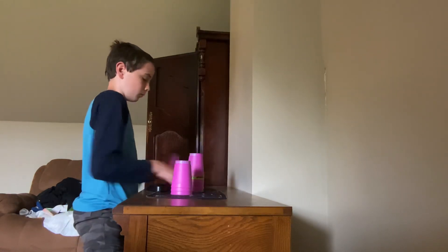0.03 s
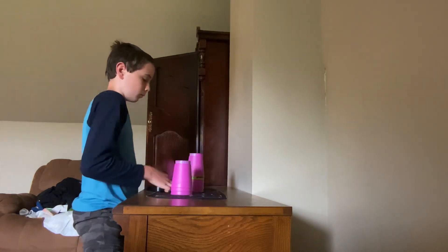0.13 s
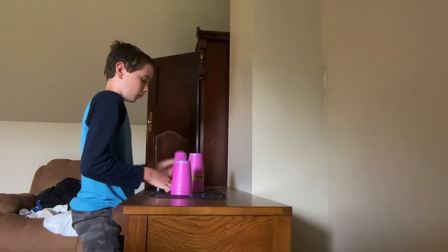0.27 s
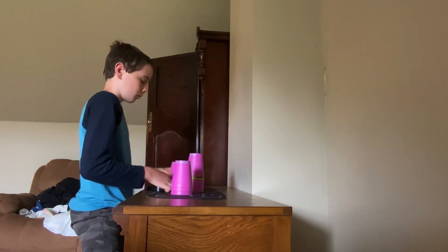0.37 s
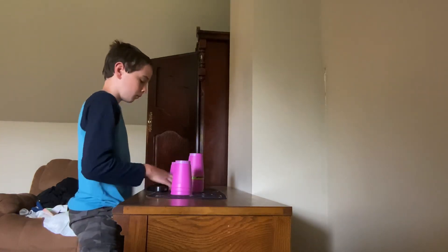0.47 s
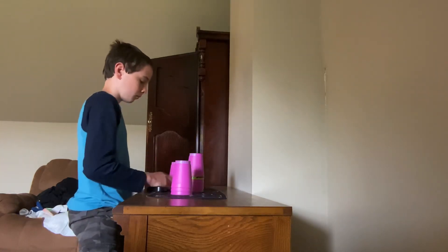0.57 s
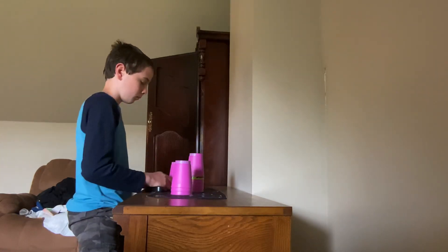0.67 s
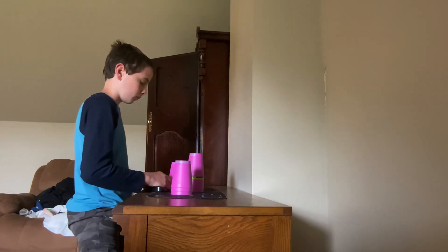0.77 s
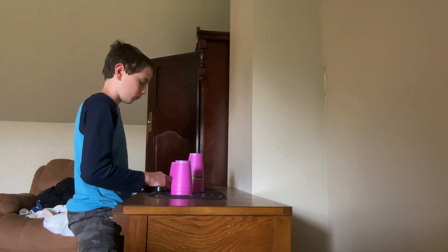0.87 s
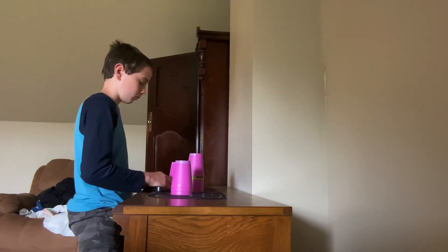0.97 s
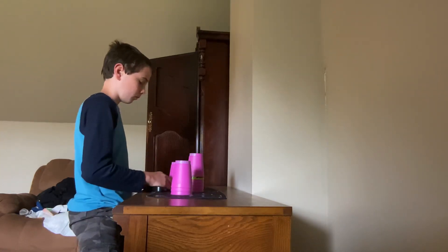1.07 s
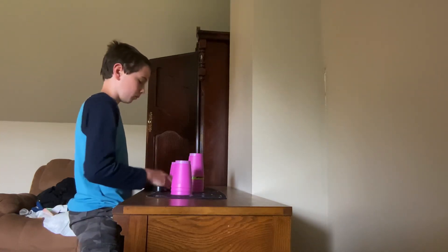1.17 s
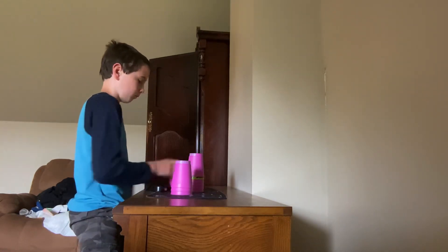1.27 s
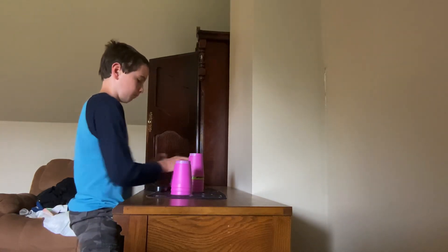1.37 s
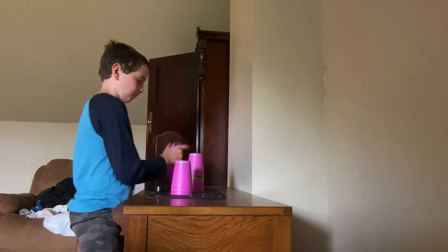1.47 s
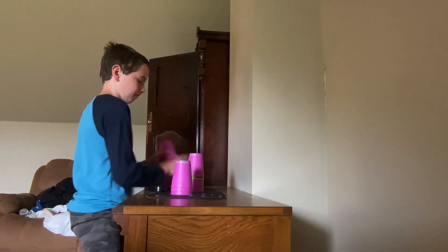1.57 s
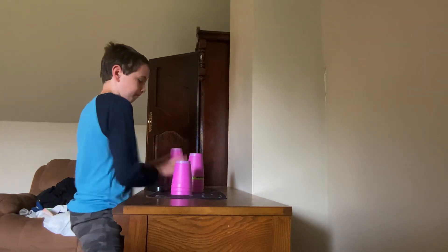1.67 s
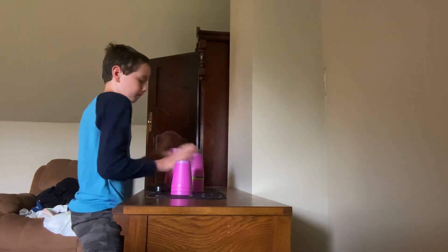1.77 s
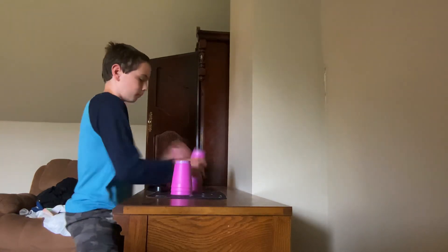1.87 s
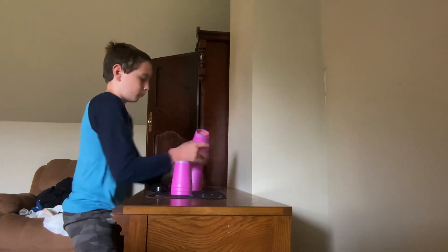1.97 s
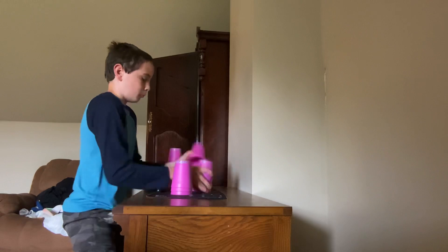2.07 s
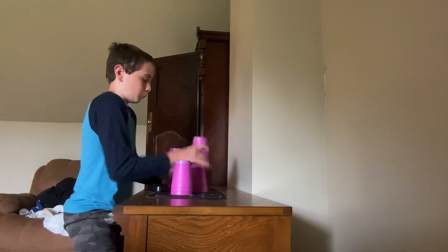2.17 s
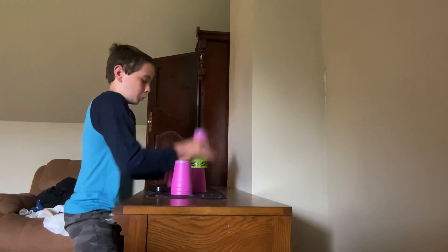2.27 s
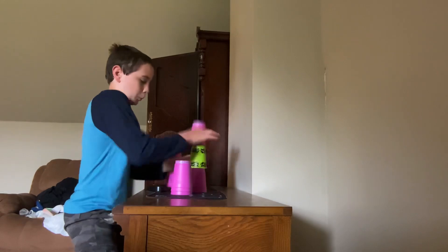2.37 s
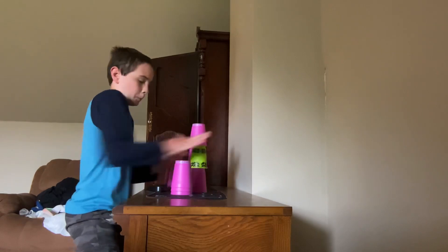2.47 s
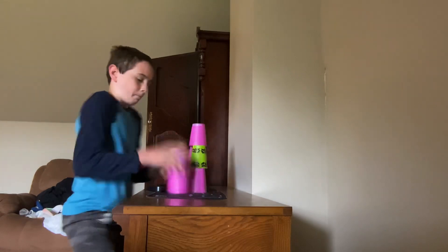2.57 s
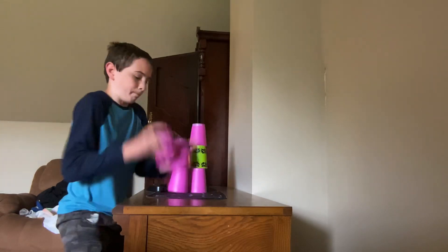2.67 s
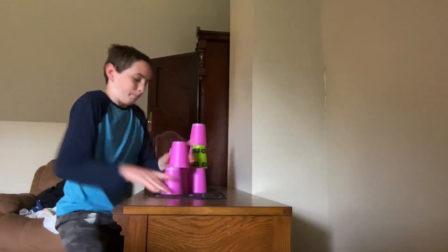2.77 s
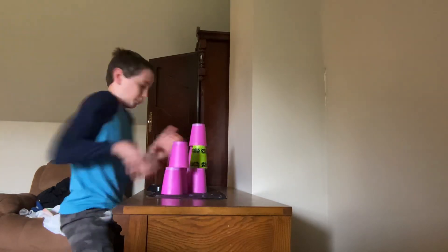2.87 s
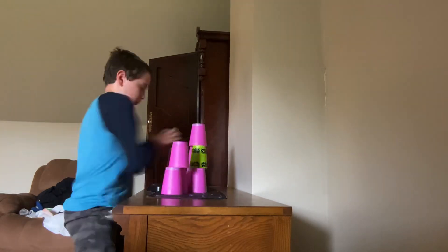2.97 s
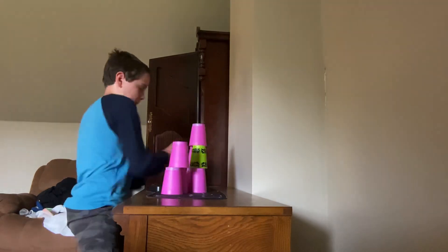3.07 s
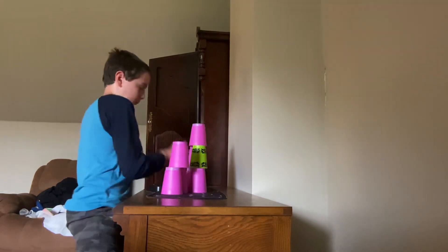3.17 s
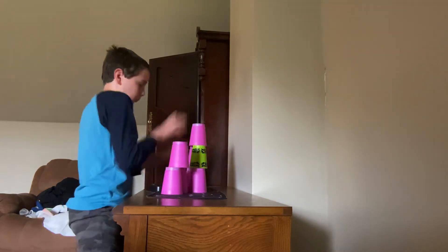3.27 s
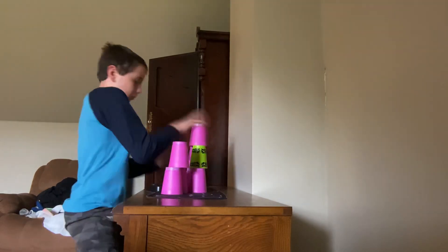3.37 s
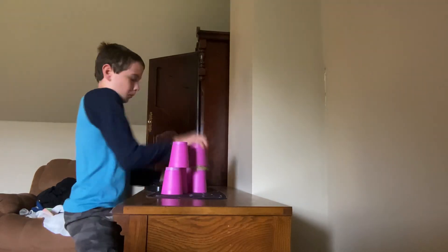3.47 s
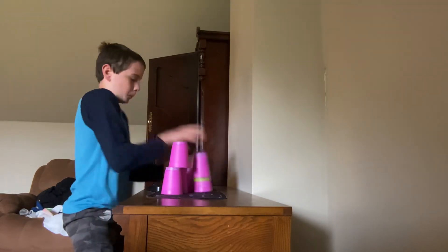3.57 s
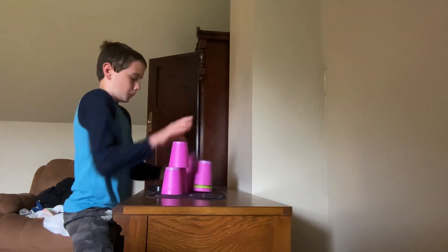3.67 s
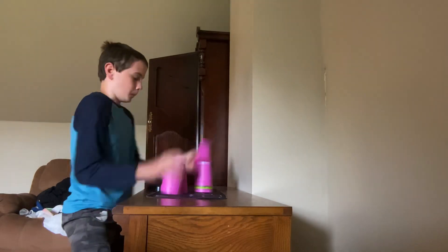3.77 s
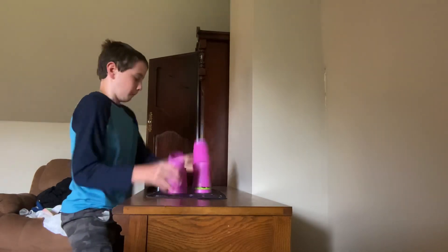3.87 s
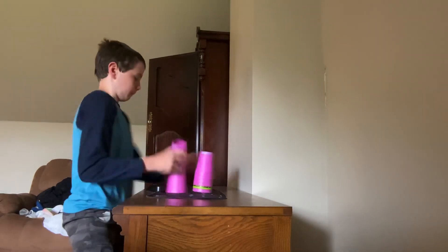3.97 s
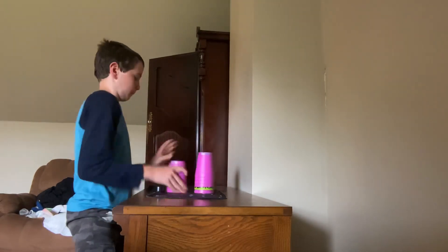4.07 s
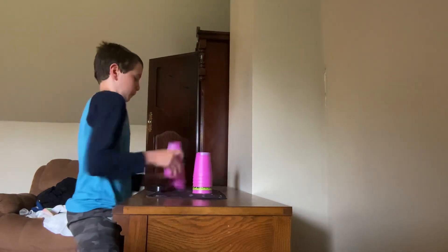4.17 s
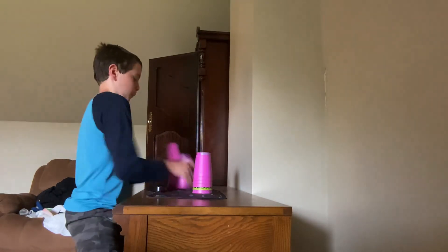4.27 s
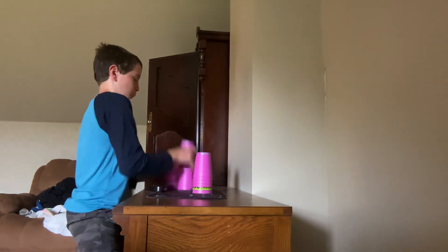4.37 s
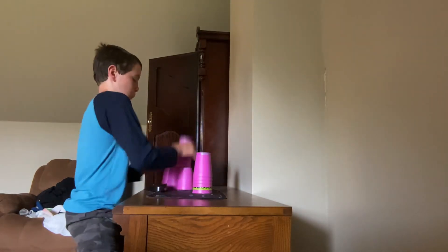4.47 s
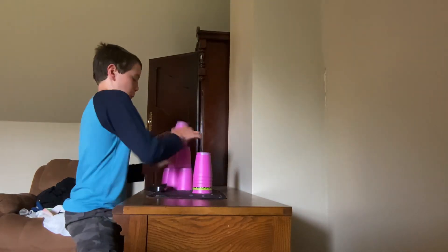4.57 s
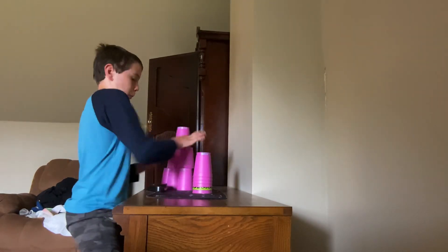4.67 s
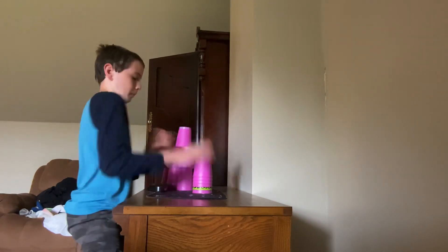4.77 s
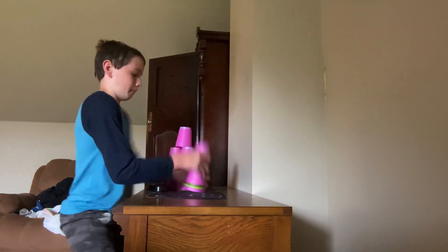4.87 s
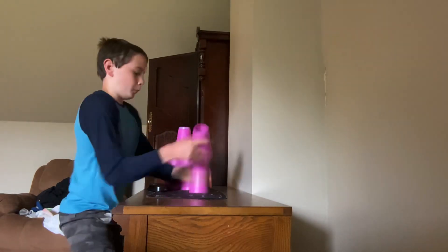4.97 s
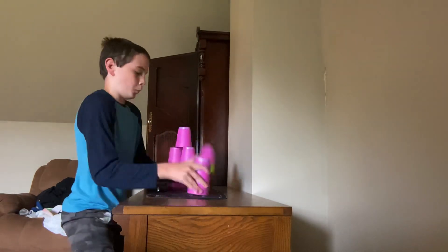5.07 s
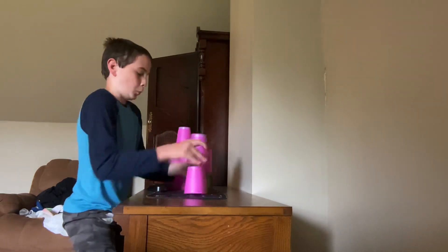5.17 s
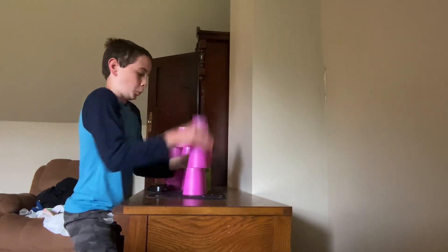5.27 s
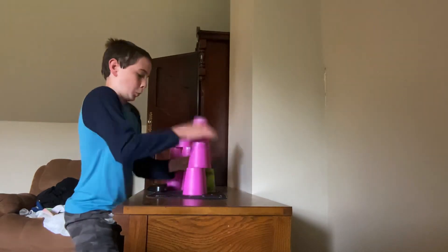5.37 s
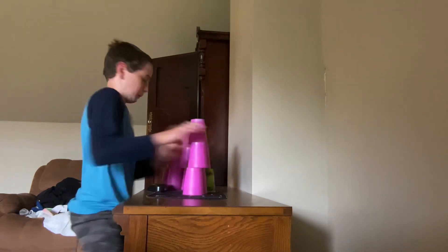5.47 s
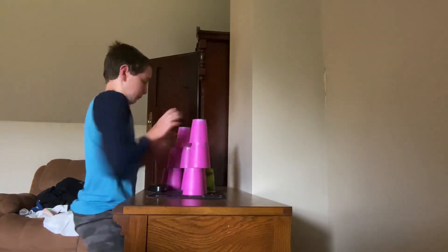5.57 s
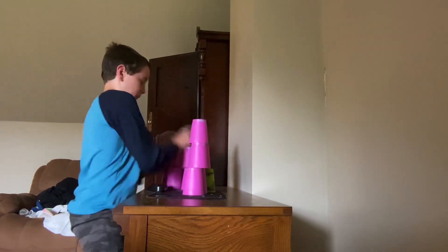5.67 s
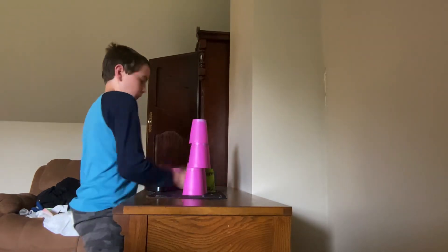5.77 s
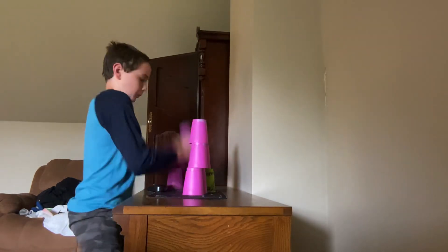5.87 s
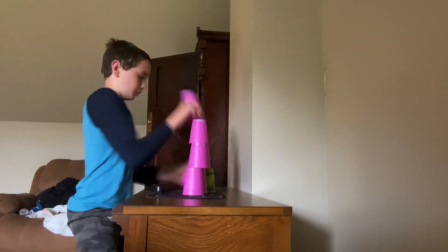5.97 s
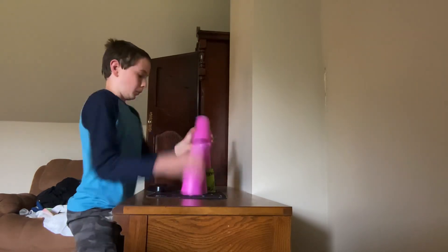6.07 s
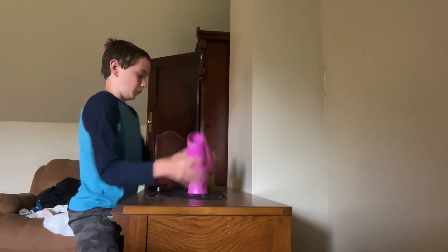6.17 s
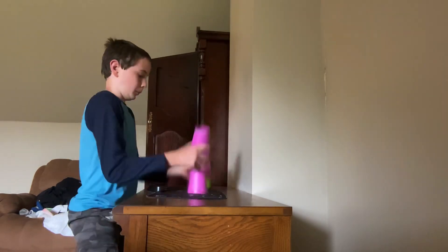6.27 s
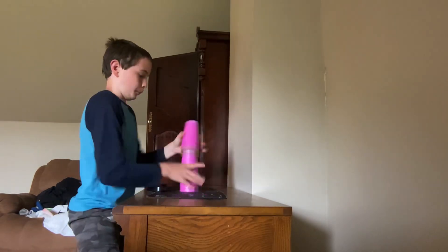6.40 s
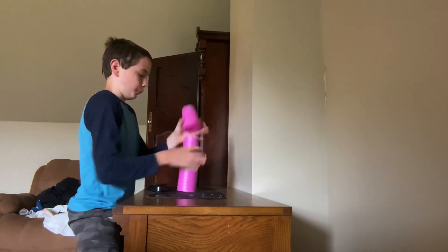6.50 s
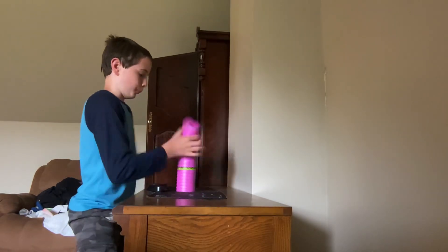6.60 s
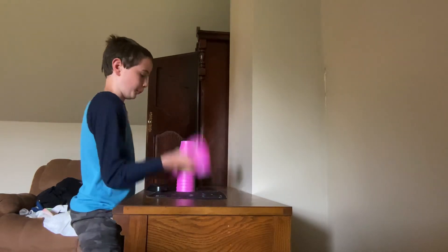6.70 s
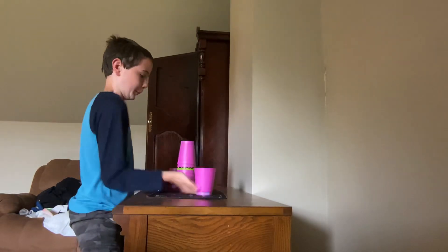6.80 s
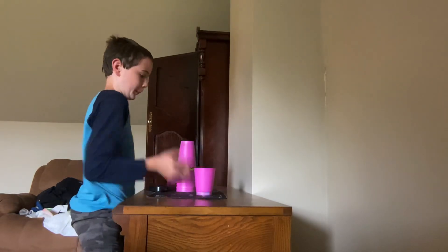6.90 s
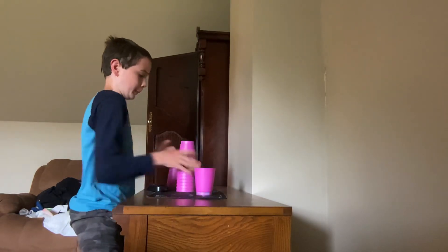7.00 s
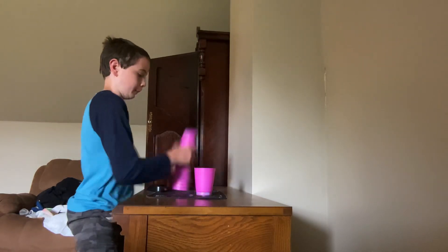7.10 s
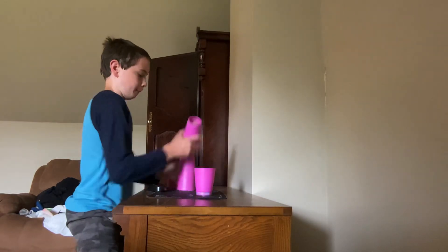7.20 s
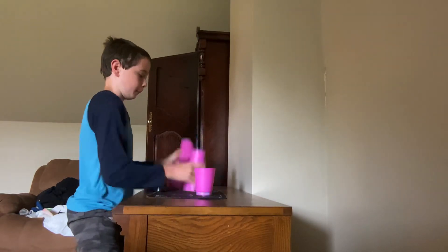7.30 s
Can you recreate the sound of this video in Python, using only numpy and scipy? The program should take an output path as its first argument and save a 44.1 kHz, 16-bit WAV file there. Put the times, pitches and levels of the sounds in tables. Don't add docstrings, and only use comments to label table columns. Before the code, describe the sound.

Fast hollow clatter of thin plastic cups, rim on rim, with soft wooden thuds beneath and short pauses, close up in a small bedroom.

```python
import sys
import numpy as np
from scipy import signal
from scipy.fft import rfft, irfft
from scipy.io import wavfile
from scipy.ndimage import uniform_filter1d

SR = 44100
rng = np.random.default_rng(int(sys.argv[2]) if len(sys.argv) > 2 else 0)


def to_linear_factor(level_db):
    exponent = np.asarray(level_db, float) / 20
    return 10 ** exponent


def store_pcm(level_fs):
    pcm = np.round(np.clip(level_fs, -1, 1) * 32767).astype(np.int16)
    wavfile.write(sys.argv[1], SR, np.atleast_2d(pcm).T)


N = 323694

# [t/s, knock level/dB, air f/Hz, thud level/dB]
LANDINGS = [(0.128, -22, 363, -15), (.277, -28, 520, -27), (1.64, -19.5, 487, -18.5),
            (2.12, -16, 515, -19.5), (2.658, -22, 820, -21.5), (2.762, -7.5, 662, -11),
            (3.083, -23, 530, -21.5), (3.26, -25.5, 490, -24), (3.433, -21, 437, -24.5),
            (3.563, -16, 518, -23.5), (3.695, -21, 500, -26), (3.836, -13.5, 830, -13),
            (3.996, -16, 635, -24), (4.091, -21, 498, -14.5), (4.34, -13.5, 610, -24.5),
            (4.432, -18.5, 354, -20.5), (4.873, -31.5, 525, -32.5), (5.11, -28, 285, -17),
            (5.252, -20, 487, -23), (5.388, -11.5, 523, -39), (5.708, -24.5, 432, -24),
            (5.74, -23, 690, -18.5), (6.035, -9, 568, -12.5), (6.277, -16.5, 651, -17),
            (6.408, -16, 428, -26), (6.568, -21.5, 521, -30), (6.814, -13.5, 460, -13)]


def evened(x):
    return x / np.sqrt(np.mean(x ** 2) + 1e-20)


def peaked(x, db):
    return to_linear_factor(db) * x / (abs(x).max() + 1e-12)


def read(points, hz):
    f, value = np.transpose(points)
    return np.interp(np.log(hz + 1), np.log(f + 1), value)


def add(mix, s, sound):
    part = mix[max(round(s * SR), 0):][:len(sound)]
    part += sound[:len(part)]


def swell(size, rise_s):
    return 1 - np.exp(-np.arange(size) / SR / rise_s)


def colour(x, points):
    log_gain = np.log(to_linear_factor(read(points, abs(np.fft.fftfreq(4096, 1 / SR)))))
    phase = -signal.hilbert(log_gain).imag
    taps = np.fft.ifft(np.exp(log_gain + 1j * phase)).real[:2048]
    return signal.oaconvolve(x, taps)[:len(x)]


def ring(modes, hz, detune, size):
    t = np.arange(size)[:, None] / SR
    ratio, db, t60_ms = np.transpose(modes)
    decay = to_linear_factor(db - 6e4 * t / t60_ms)
    return (decay * np.sin(2 * np.pi * hz * ratio * detune * t)).sum(1)


def hush():
    # [f/Hz, level/dB per Hz]
    air_spectrum = [(18, -41), (30, 6.5), (194, -5.5), (280, -17.5), (415, -4), (569, -17.5), (616, -15),
                    (1280, -14), (10800, -20), (16000, -14)]
    # [f/Hz, level/dB]
    hum_tones = [(199.2, -109.5), (414.5, -92), (624.5, -100)]
    t = np.arange(N) / SR
    hum = np.zeros(N)
    for hz, db in hum_tones:
        hum += to_linear_factor(db) * np.sqrt(2) * np.sin(2 * np.pi * (hz * t + rng.random()))
    return to_linear_factor(-79) * evened(colour(rng.standard_normal(N), air_spectrum)) + hum


def room(x, tail_db):
    # [delay/ms, level/dB]
    first_echoes = [(8.3, -4.5), (12.9, -9.5), (21.7, -32.5)]
    # [f/Hz, t60/s]
    room_decay = [(100, 0.58), (260, 0.13), (700, 0.41), (1840, 0.43), (4850, 0.48), (11000, 0.29),
                  (15000, 0.27)]
    out, t = np.zeros(N), np.arange(N) / SR
    for ms, db in first_echoes:
        add(out, ms / 1000, to_linear_factor(db) * x)
    for k in range(3):
        taps = np.zeros(SR)
        at = np.arange(200, SR - 12, 12)
        taps[at + rng.integers(0, 12, len(at))] = rng.choice([-1., 1.], len(at))
        hz, s, bands = signal.stft(taps, SR, nperseg=256)
        decay = to_linear_factor(-60 * s / read(room_decay, hz)[:, None])
        tail = signal.istft(bands * decay, SR, nperseg=256)[1]
        tail = tail * swell(len(tail), 0.0057)
        share = np.sqrt(2 / 3) * np.cos(np.pi * (2.3 * t + k / 3))
        out += to_linear_factor(tail_db) * signal.fftconvolve(x * share, tail / np.linalg.norm(tail))[:N]
    return out


def slide():
    # [hardest rub t/s, length/s, level/dB, rims against walls/dB]
    rubs = [(-0.02, 0.81, -28.5, -6.5), (1.43, 0.34, -71.5, 15.5), (1.535, 0.16, -42.5, 13.5),
            (1.708, 0.18, -29.5, -10), (1.984, 1, -61.5, 15), (2.36, 0.81, -43, -30), (2.74, 0.17, -42, -8),
            (2.86, 0.063, -32, -43), (3.268, 0.6, -38.5, 8.5), (3.737, 0.22, -24.5, -21),
            (3.98, 0.67, -34.5, 3.5), (4.58, 0.41, -40, -14), (5.03, 0.97, -49.5, -3),
            (5.445, 0.096, -25.5, -22), (5.777, 0.18, -22.5, 6.5), (5.925, 0.67, -36, 7),
            (6.206, 0.54, -29.5, -19), (6.454, 0.13, -39, 10.5), (6.649, 0.06, -38, 6),
            (7.19, 0.16, -37, -10), (3.566, .2, -29, 4), (1.288, 0.23, -55.5, -30),
            (2.781, 0.069, -19.5, -29), (5.973, .12, -35.5, -17), (2.314, 0.19, -36, -31),
            (4.536, .12, -44, -20)]
    # [f/Hz, level/dB]
    fizz_spectrum = [(1500, -9), (2800, 0), (4000, -1.5), (7000, 1.5), (12000, 0), (16000, -3)]
    # [f/Hz, level/dB]
    rumble_spectrum = [(250, -14), (600, -7.5), (1100, -12.5), (1900, -7.5), (2500, -15), (5000, -21.5)]
    catches_per_s, catch_spread_db = 2500, 4.2
    rise_share, edge_db = 0.47, -28
    size_db = catch_spread_db * np.minimum(rng.exponential(1, N), 3)
    catches = rng.standard_normal(N) * to_linear_factor(size_db) * (rng.random(N) < catches_per_s / SR)
    fizz = evened(colour(catches, fizz_spectrum))
    rumble = evened(colour(catches, rumble_spectrum))

    t = np.arange(0, N / SR, .002)
    s, length, db, rim_db = np.transpose(rubs)[:, :, None]
    away = np.maximum((s - t) / rise_share, (t - s) / (1 - rise_share)) / length
    push = to_linear_factor(db + edge_db * away ** 2)
    rim_push = (push * to_linear_factor(rim_db - 10.5)).sum(0)
    wall_push = (push * to_linear_factor(-8.0)).sum(0)
    fine_t = np.arange(N) / SR
    return fizz * np.interp(fine_t, t, rim_push) + rumble * np.interp(fine_t, t, wall_push)


def thuds():
    # [t/s, level/dB, f/Hz]
    nudges = [(.004, -23, 162), (.413, -23.5, 178), (0.595, -32, 183), (0.633, -41.5, 204),
              (1.269, -43, 190), (1.332, -38, 163), (1.417, -44, 155), (1.521, -32, 170), (1.98, -40, 148),
              (2.593, -18.5, 180), (2.741, -30, 192), (2.804, -13.5, 182.6), (3.891, -30, 164),
              (4.214, -25.5, 168), (4.602, -23, 167), (4.651, -20.5, 160), (4.98, -38.5, 167),
              (5.426, -19.5, 203), (5.788, -18.5, 166), (5.821, -22, 187), (5.959, -23.5, 177),
              (6.146, -7.5, 222), (6.154, -10.5, 168), (6.661, -31, 204), (7.187, -28.5, 188),
              (7.26, -34.5, 144)]
    # [ratio to thud, level/dB, t60/ms]
    chest_modes = [(1, 2, 43.8), (1.25, -9, 34.4), (1.9, -2.5, 30)]
    # [f/Hz, level/dB, t60/ms]
    frame_modes = [(58, -4, 170), (75, 0, 170)]
    # [t/s, level/dB]
    sways = [(0.142, -47), (0.284, -61.5), (0.595, -52.5), (1.276, -60), (1.694, -49), (1.991, -55),
             (2.149, -55), (2.274, -65), (2.588, -55), (2.771, -54.5), (3.129, -57), (3.261, -53),
             (3.511, -46.5), (3.764, -49), (3.858, -50), (4.026, -52), (4.115, -51), (4.199, -57),
             (4.352, -60), (4.442, -57), (4.976, -56), (5.125, -46), (5.775, -48), (5.831, -52),
             (5.969, -46), (6.066, -45.5), (6.172, -33), (6.4, -42), (6.601, -52), (7.076, -52)]
    lag_s, top_hz, hz_per_db, firm_db = .005, 167, 2.5, -22.5
    rows = []
    for s, _, _, db in LANDINGS:
        rows.append((s + lag_s, db, top_hz + hz_per_db * max(db - firm_db, 0)))
    rows += nudges
    out, chance = np.zeros(N), rng.random((len(rows), len(chest_modes)))
    rise = swell(4000, 0.0089) ** 2
    for (s, db, hz), u in zip(rows, chance):
        thud = ring(chest_modes, hz, 1 + [0, .1, .15] * (u - .5), size=4000)
        add(out, s - .009, peaked(thud * rise, db - 9.5))
    sway = ring(frame_modes, 0.96, 0.96, size=12000) * swell(12000, 0.018) ** 2
    for s, db in sways:
        add(out, s - .015, peaked(sway, db + 14.5))
    return out


def knocks():
    # [t/s, level/dB, f/Hz]
    cup_on_cup = [(0.321, -20, 430), (1.491, -27.5, 858), (1.686, -12, 770), (1.712, -13.5, 648),
                  (2.293, -17, 608), (2.392, -16, 688), (2.421, -10, 868), (4.979, -26, 486),
                  (2.779, -9.5, 487), (2.797, -7, 810), (3.093, -18.5, 353), (3.501, -30, 510),
                  (3.533, -27, 460), (3.891, -18.5, 439), (4.598, -14.5, 740), (4.64, -46, 680),
                  (4.662, -17.5, 650), (5.131, -8, 510), (5.267, -16, 647), (5.336, -22, 603),
                  (5.437, -13.5, 554), (5.829, -11.5, 537), (6.145, -3, 316), (6.1625, -14.5, 358),
                  (6.219, -19.5, 487), (3.504, -21, 478), (3.568, -19, 550), (3.58, -18.5, 620),
                  (5.832, -13, 885), (6.052, -7.5, 1038), (6.412, -17.5, 513), (2.81, -14, 713),
                  (3.113, -21, 1150), (6.361, -12.5, 538)]
    rows = [row[:3] for row in LANDINGS] + cup_on_cup
    out, chance = np.zeros(N), rng.random((len(rows), 4))
    modes = [(.72, -4.5, 28), (1, 0.5, 32), (1.17, -2.5, 28.4), (1.4, -1.5, 24)]  # ratio, dB, t60 ms
    rise = swell(2500, 0.0037) ** 2
    for (s, db, hz), u in zip(rows, chance):
        detune = 1 + [0.31, 0, 0.086, 0.28] * (u - .5)
        add(out, s - .005, peaked(ring(modes, hz, detune, size=2500) * rise, db - 8.5))
    return out


def pops():
    # [t/s, level/dB, f/Hz, t60/ms]
    contacts = [(.325, -25.5, 515, 23), (2.774, -19, 1040, 21), (2.79, -20, 1520, 15),
                (2.821, -24.5, 1147, 20), (3.517, -13.5, 1804, 12), (3.7375, -11.5, 4150, 7.5),
                (4.012, -23.5, 1440, 16), (4.357, -33, 1890, 20), (4.523, -35, 1756, 23),
                (4.65, -21.5, 1153, 21), (5.114, -26.5, 400, 38), (5.135, -20, 572, 27),
                (5.166, -25.5, 2030, 8.3), (5.185, -26.5, 978, 33), (5.425, -18, 1186, 19),
                (5.832, -19, 800, 12.7), (6.037, -10, 606, 17), (6.568, -14, 1557, 25),
                (6.82, -34, 3160, 9)]
    rise_s = 0.0028
    out = np.zeros(N)
    rise = swell(2000, rise_s) ** 2
    for s, db, hz, t60_ms in contacts:
        mode = ring([(0.98, 0, max(t60_ms, 8))], hz, 0.98, size=2000)
        add(out, s - 2 * rise_s, peaked(mode * rise, db))
    return out


def clacks():
    # [t/s, ring level/dB, wall ring f/Hz, tick against ring/dB]
    taps = [(.0917, -22.5, 1360, 4), (.4504, -21, 1940, -16), (.583, -34.5, 1660, -14.5),
            (3.2582, -7.5, 2240, -7), (3.271, -12.5, 1550, -5.5), (3.5134, -6, 1690, -13.5),
            (3.5178, -3.5, 1840, -5), (3.532, -16, 1150, -21), (3.541, -13, 1900, -24),
            (3.5745, -19, 1300, -6), (3.581, -13, 1520, -11), (3.592, -11, 1750, -4),
            (5.4395, -11.5, 1120, -23), (2.432, -8, 1410, -8.5), (1.947, -31, 3000, -1),
            (3.2635, -20, 2240, -1), (5.7525, -16, 2180, -7), (6.0694, -2.5, 1850, -12.5),
            (6.0745, -14, 2000, -4), (6.1074, -10.5, 3570, -4), (6.2791, -4, 1530, -10),
            (6.292, -28, 1590, -22), (6.3335, -15.5, 1330, -5), (6.418, -37, 1700, 2),
            (6.619, -27, 1490, -21), (1.9233, -24.5, 1440, -33), (2.2947, -12.5, 1370, -15.5),
            (2.3917, -14, 1160, -15.5), (2.5936, -25.5, 1210, -2.5), (2.6468, -8, 1870, -8.5),
            (2.7618, -15, 2030, -23), (2.7668, 1, 1880, -22), (2.788, -5, 1280, -12.5),
            (3.8315, -8, 3830, 0), (3.8376, -3, 3900, -45), (3.9973, -8.5, 1830, -9.5),
            (4.8702, -27, 3780, -4.5), (5.3876, -13, 1730, -13), (5.426, -9.5, 1340, -25),
            (5.8076, -6, 1800, 0), (5.8123, -5, 1930, -19), (6.1353, -8, 2150, 0), (6.14, -9.5, 2100, -19),
            (6.2172, -9, 1910, -4), (3.7375, -10.5, 4240, -6.5), (6.3623, -12, 1610, -8),
            (7.0686, -38, 1730, 1.5), (7.095, -28, 1040, -10), (7.1818, -24, 1780, -20)]
    clinks = [(1.2633, -35, 1510, -26), (1.492, -21.5, 2020, -17), (1.6739, -13, 1090, -11),
              (1.6788, -14, 1170, -2), (1.8914, -31.5, 2180, -2), (1.9715, -15, 1830, -15),
              (1.9768, -12.5, 1885, -8.5), (2.114, -14.5, 1770, -10), (2.1198, -1, 1890, -12.5),
              (2.4239, -5.5, 1150, -14), (2.5431, -39, 1130, -39), (3.714, -10.5, 1810, -8),
              (3.7383, -6.5, 1890, -22.5), (4.5058, -25.5, 1800, -3), (4.521, -25, 1050, -11),
              (4.6441, -10.5, 1190, -26), (5.1262, -23.5, 960, -2), (5.3303, -26, 1140, -7.5),
              (5.3837, -17, 1880, -11), (5.6925, -33, 1020, 2.5), (6.0325, -11.5, 1230, 1.5),
              (6.4052, -5.5, 1820, -6), (6.5645, -9.5, 1440, -9.5), (6.5695, -10, 1440, -20.5)]
    nests = [(.0749, -28.5, 1400, 2), (.1156, -6, 3350, -2.5), (.3022, -21, 1860, -1.5),
             (.4074, -15.5, 1740, -10), (.5949, -23.5, 1950, -21), (1.6437, -26, 1248, -24),
             (1.6868, -9.5, 1160, -25), (3.0871, -22, 1860, -2), (3.1541, -33.5, 3740, 7.5),
             (3.5606, -4.5, 1860, -3.5), (3.6964, -19, 2100, 1), (4.0925, -13.5, 1490, -5.5),
             (4.1817, -19.5, 2080, -17), (4.6387, -11, 1480, -6), (4.6798, -17.5, 1190, -11),
             (4.9482, -18.5, 1780, -9), (5.1422, -9, 1100, -9), (5.745, -24, 2300, 6),
             (5.7752, -8, 1810, -5), (5.787, -9, 2240, -10), (6.8178, -14, 950, -21),
             (7.1707, -28, 1830, -5.5), (4.3419, -15, 1880, -11.5)]
    sets = [(1.236, -53, 1600, -19), (1.321, -36, 1640, -15), (1.4973, -28.5, 1520, 2),
            (1.6547, -25, 1030, -47), (2.208, -20.5, 1970, -12), (2.276, -47, 1880, 15),
            (3.2417, -42, 1480, 6), (3.4593, -22.5, 1130, -1), (3.4726, -24.5, 1170, 5),
            (3.502, -14.5, 1090, -2.5), (3.8013, -25.5, 2020, 7.5), (3.8912, -8, 1954, -8.5),
            (4.0124, -15, 1390, -26), (1.266, -42, 2470, -15), (4.4343, -28, 920, 0),
            (4.601, -22, 1180, -6.5), (4.9159, -31.5, 2090, -2.5), (4.9791, -23, 1850, -10.5),
            (5.1122, -26, 1740, -2), (5.2688, -18.5, 1870, -10.5), (5.4213, -4, 1400, -8),
            (5.7121, -28.5, 1140, -9), (5.9386, -38.5, 1640, 16.5), (6.107, -29.5, 1860, 14),
            (6.4611, -23, 1590, -21), (6.8105, -20, 900, -13), (7.2047, -37, 1606, -7)]
    # [ratio to ring, level/dB, share of its t60]
    wall_modes = [(.6, -17.5, 1), (1, -2, 0.73), (1.12, -4.5, 0.32), (1.8, -12.5, 0.84)]
    # [f/Hz, level/dB]
    tick_spectrum = [(300, -23.5), (1500, -18), (2600, -16.5), (3500, -8.5), (7000, -8), (12000, -8.5),
                     (16000, -7.5)]
    drop_ms, slide_in_ms = 4.1, 7.65
    held_ms, free_ms = 5.5, 20
    far_ms, far_share = 2.5, .55
    blow_spread = 0.083
    bounce_ms, bounce_db = (3, 34), -15
    tint_db = 3.5

    walls, ticks, gathered, far = np.zeros((4, N))
    kinds = [(taps, drop_ms, held_ms), (clinks, drop_ms, free_ms),
             (nests, slide_in_ms, held_ms), (sets, slide_in_ms, free_ms)]
    blows = [(*row, scrape_ms, ring_ms) for rows, scrape_ms, ring_ms in kinds for row in rows]
    chance = rng.random((len(blows), len(wall_modes)))
    grit = rng.standard_normal((len(blows), 3, 3600))
    tint = evened(uniform_filter1d(rng.standard_normal((len(blows), 1801)), size=70))
    grit[:, 1] = evened(irfft(rfft(grit[:, 1]) * to_linear_factor(tint_db * tint)))
    t_ms = np.arange(3600) / SR * 1000 - 45
    slap = np.exp(-(t_ms / 1.68) ** 2)
    snap = np.exp(-((t_ms + 1.419) / 0.059) ** 2)
    wall_rise = swell(1500, 0.00079)

    for (s, db, hz, tick_db, scrape_ms, ring_ms), u, noise in zip(blows, chance, grit):
        scrape_ms, ring_ms = np.multiply([scrape_ms, ring_ms], 1 + blow_spread * (2 * u[2:] - 1))
        brush = 0.15 * np.exp(np.minimum(t_ms + scrape_ms, 0) / 1.0)
        scrape = 0.51 / (1 + np.exp(-(t_ms + scrape_ms) / 2.0))
        scrape = (brush + scrape) * np.exp(-np.maximum(t_ms, 0) / (7 + 0.93 * scrape_ms))
        scrape = scrape * to_linear_factor(4.1 * evened(uniform_filter1d(noise[2], size=40)))
        bounce_at = np.interp(u[1], [0, 1], bounce_ms)
        bounce = to_linear_factor(bounce_db) * np.exp(-((t_ms - bounce_at) / 0.5) ** 2)

        blow = snap + 0.48 * (scrape + slap) * noise[0]
        detune = np.where(np.arange(len(wall_modes)) == 1, 1, 1 + .3 * (u - .5))
        wall = ring(np.multiply(wall_modes, [1, 1, max(ring_ms, 3)]), hz, detune, size=1500) * wall_rise
        start = s + t_ms[0] / 1000
        near = peaked(signal.fftconvolve(blow, wall), db - 3.5)
        add(walls, start, near)

        far_modes = np.multiply(wall_modes, [1, 1, 0]) + [0, 0, far_ms + far_share * ring_ms]
        wide = ring(far_modes, hz, detune, size=900)
        add(far, s, wide * np.linalg.norm(near) / np.linalg.norm(wide))

        spit = to_linear_factor(db + tick_db + 6.0) * (scrape + 1.2 * slap + bounce) * noise[1]
        add(ticks, start, spit)
        add(gathered, s - .002, np.array([np.linalg.norm(spit)]))
    to_room = to_linear_factor(-6.0) * colour(gathered, tick_spectrum) + to_linear_factor(-8.0) * far
    return walls, colour(ticks, tick_spectrum), to_room


def scene():
    walls, ticks, gathered = clacks()
    chest = thuds()
    air = knocks() + pops()
    rub = slide()
    echoes = room(rub + to_linear_factor(0.07) * air + gathered + to_linear_factor(-6.0) * chest, tail_db=2.5)
    return (walls + ticks + chest + air + rub + echoes + hush())[None]


def roll_off(x):
    return signal.sosfilt(signal.butter(12, 16820, fs=SR, output="sos"), x)


def record(dry):
    # [f/Hz, level/dB]
    mic_response = [(40, -28.5), (110, -3), (160, 13), (6000, -3), (6500, -6), (9400, -2), (10300, 0),
                    (11100, 5.5), (11600, -7.5), (11900, -2.5), (15500, -11.5), (16200, -44.5)]
    x = np.tanh(colour(dry[0], mic_response) * 1.05) / 1.05
    x = signal.oaconvolve(x, signal.firwin(255, 16300, fs=SR), "same")
    return roll_off(x[None])


dry = scene()
out = record(dry)
store_pcm(out)
```